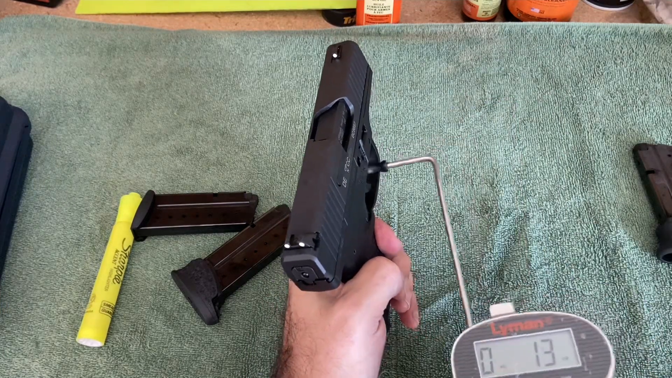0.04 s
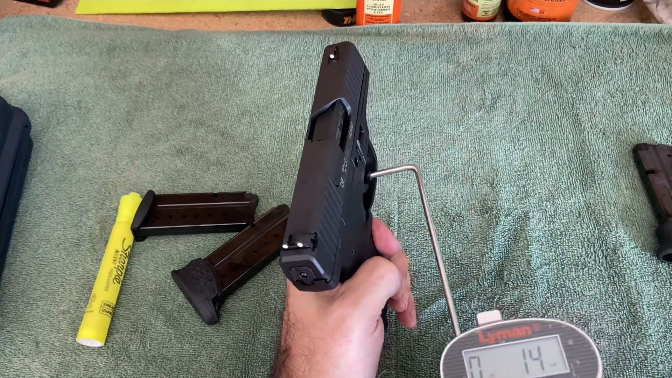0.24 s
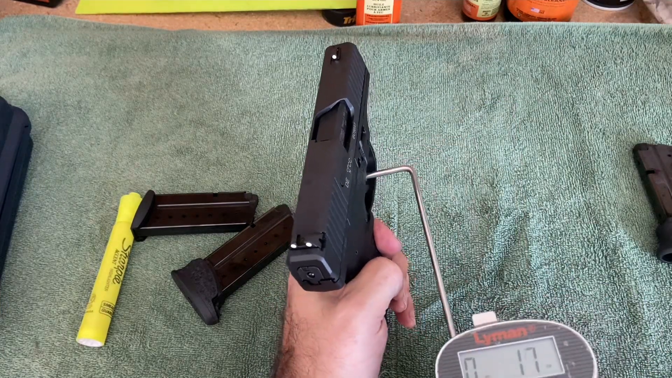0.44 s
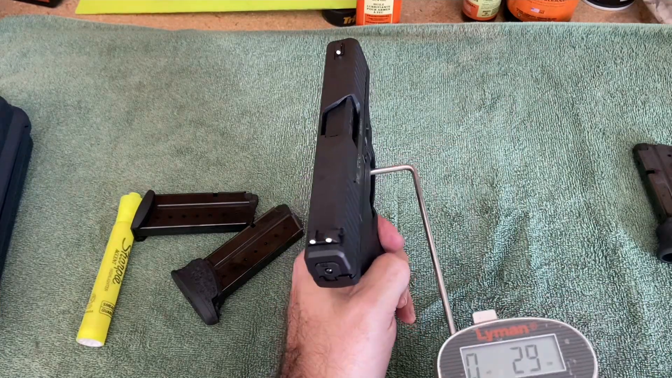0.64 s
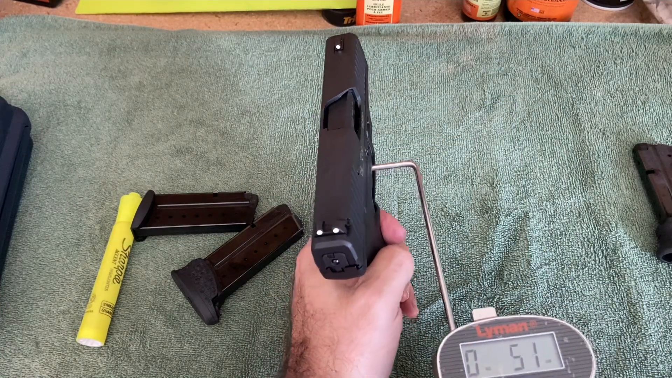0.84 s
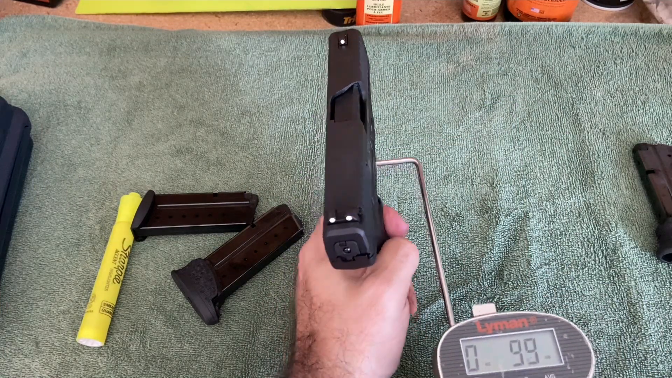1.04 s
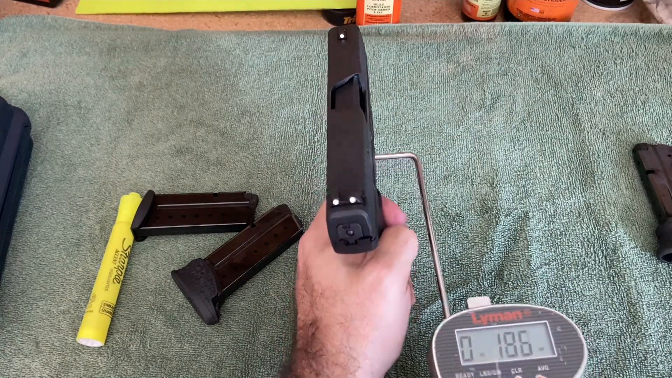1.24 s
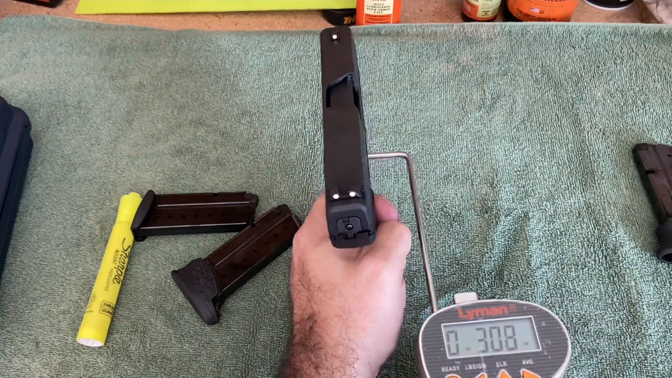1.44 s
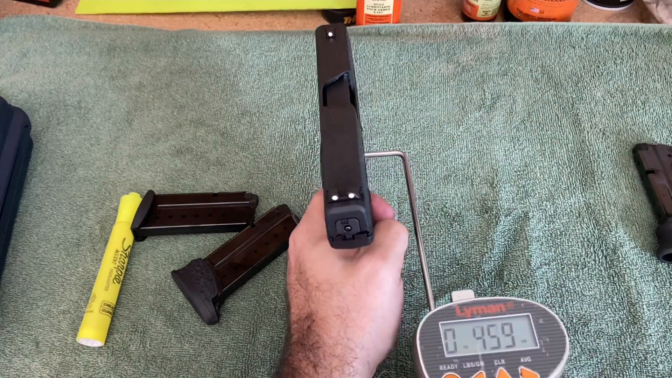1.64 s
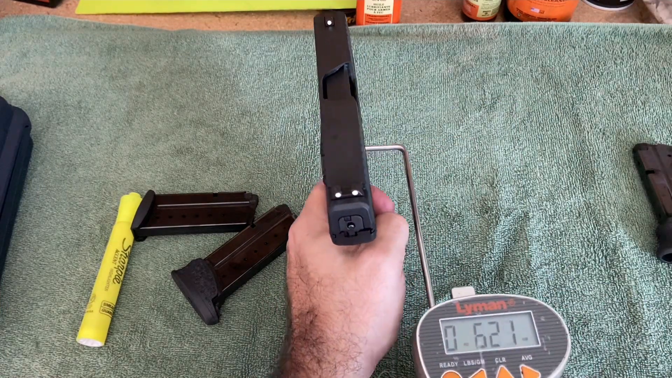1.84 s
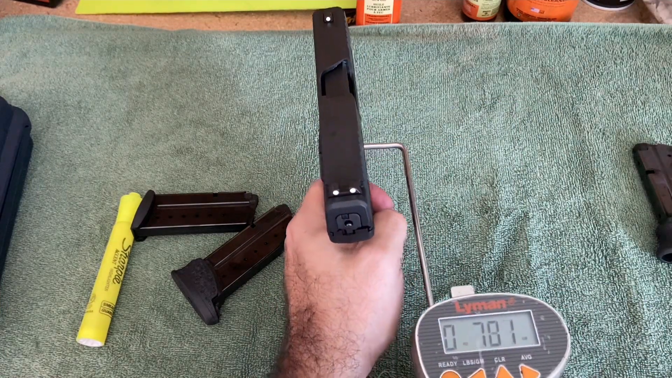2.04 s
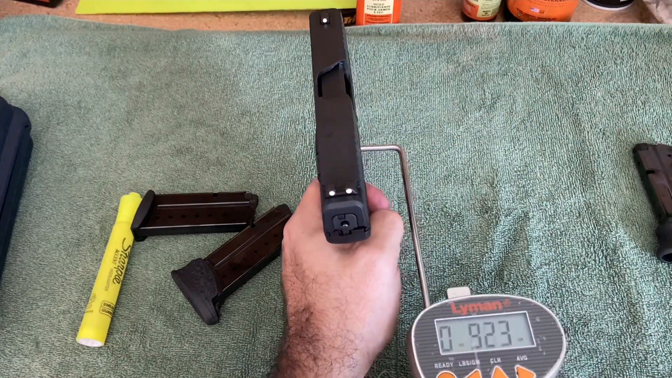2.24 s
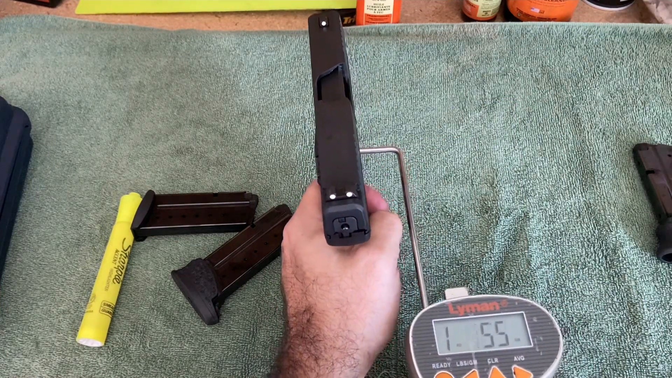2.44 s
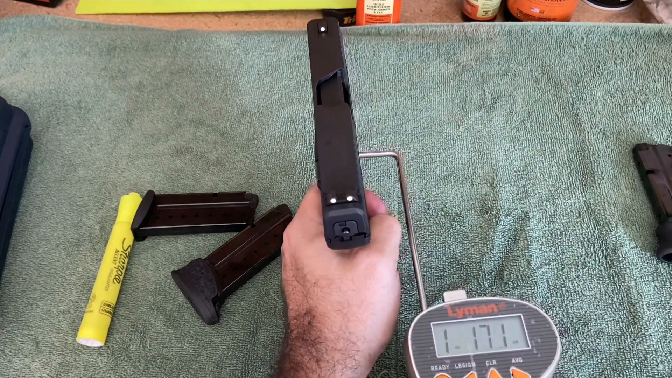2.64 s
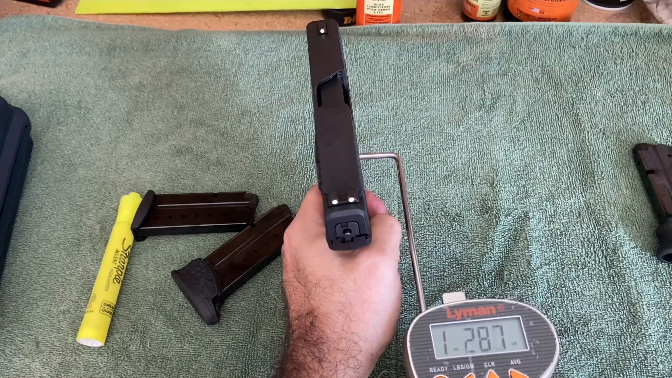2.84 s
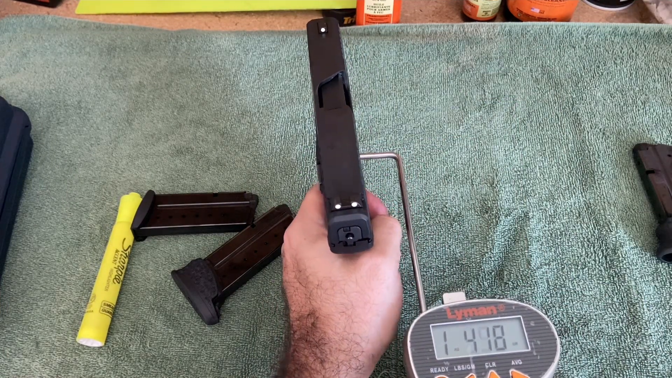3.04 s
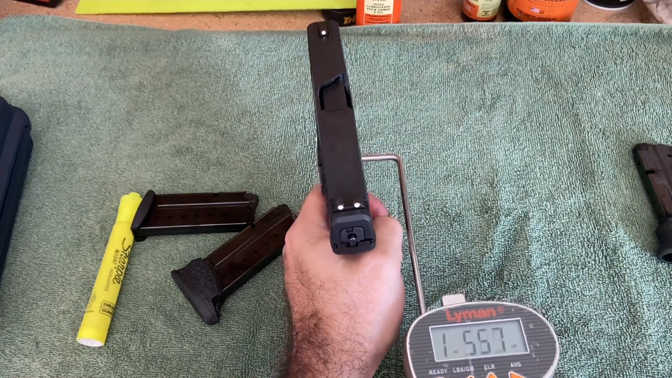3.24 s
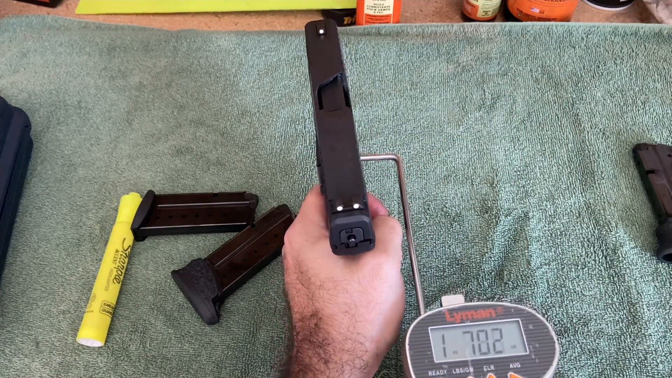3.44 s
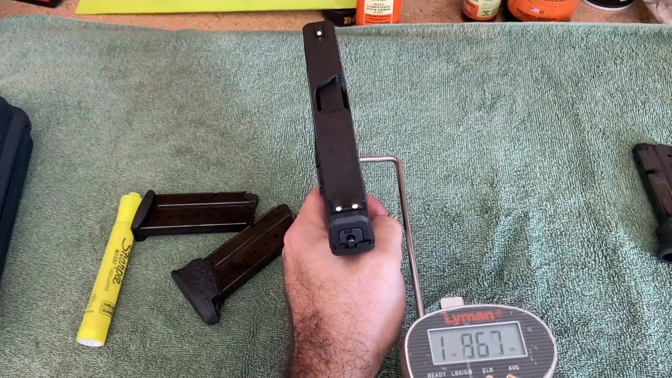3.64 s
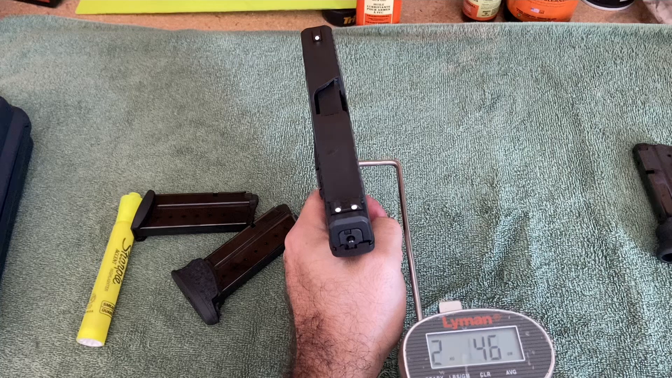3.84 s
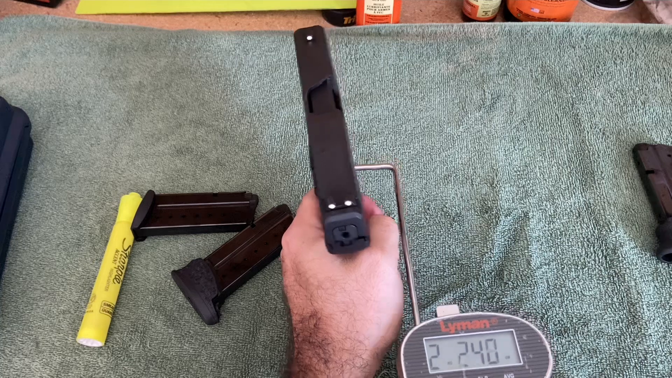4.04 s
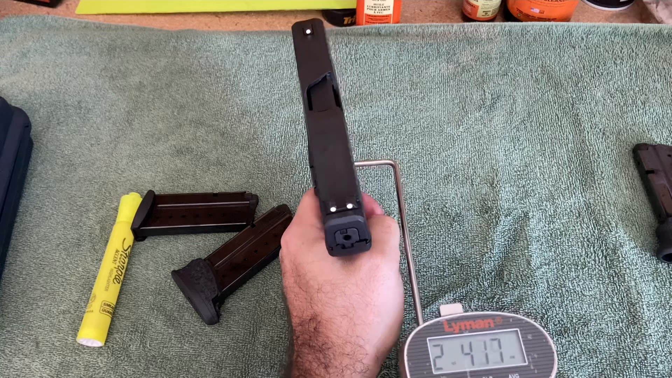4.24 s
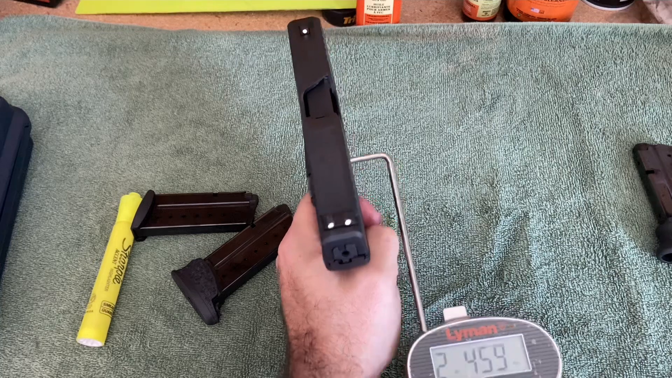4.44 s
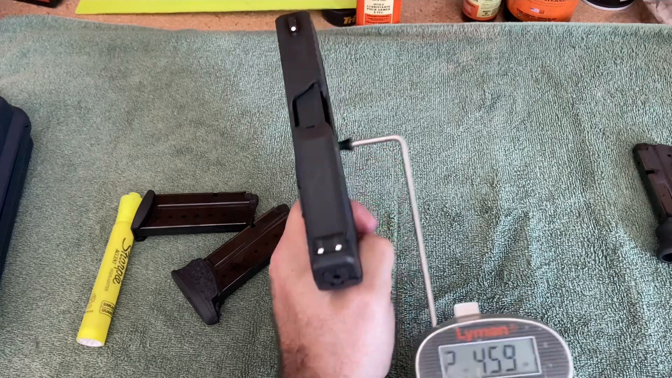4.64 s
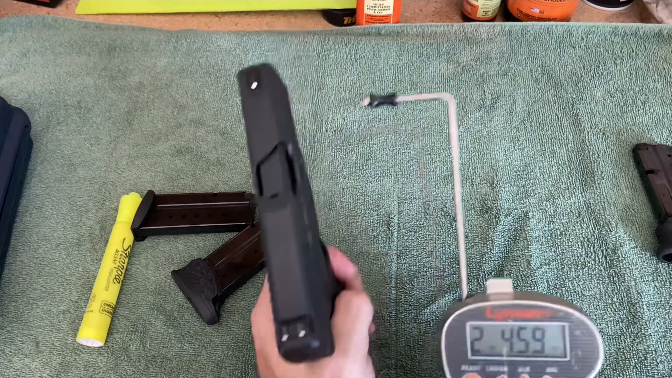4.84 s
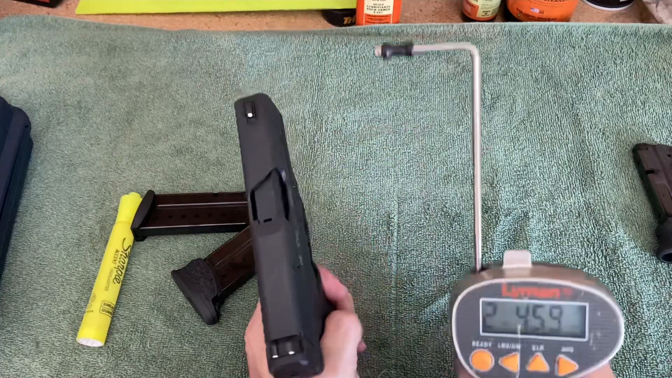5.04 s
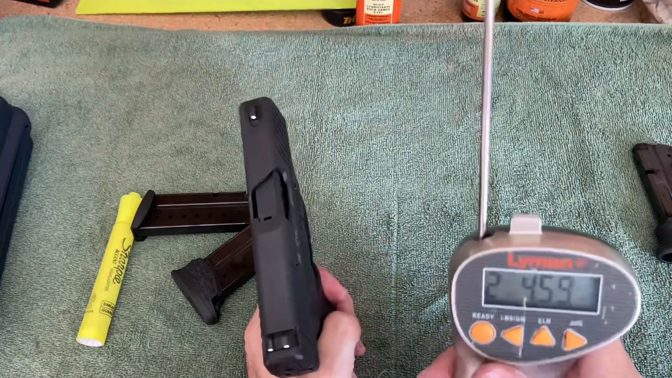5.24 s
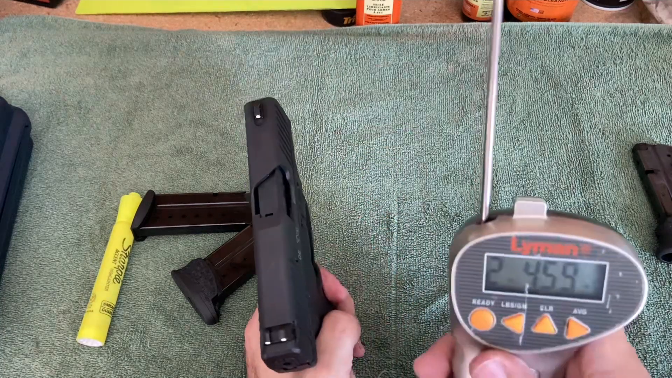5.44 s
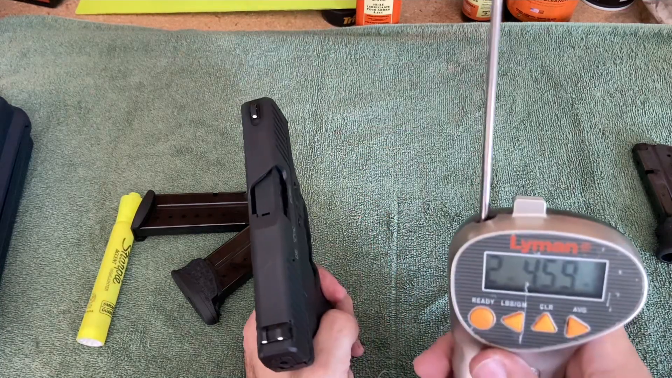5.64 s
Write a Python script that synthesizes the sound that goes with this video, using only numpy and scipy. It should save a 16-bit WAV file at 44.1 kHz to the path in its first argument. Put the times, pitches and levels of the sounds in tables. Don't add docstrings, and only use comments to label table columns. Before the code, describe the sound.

Very close to a phone microphone in a quiet room, an unloaded pistol's trigger is pulled slowly by a metal gauge hook. Sparse, tiny ticks come first, a few clearer before the end of the pull. Near four seconds the striker releases with a hard, bright metallic snap, far louder than everything else, with brief room echo. Dull settling knocks and thin metal taps follow over faint rumble and fan noise.

```python
import sys
import numpy as np
from scipy import signal
from scipy.fft import rfft, irfft, next_fast_len
from scipy.io import wavfile

SR = 44100
rng = np.random.default_rng(int(sys.argv[2]) if len(sys.argv) > 2 else 0)


def gain_from_db(level_db):
    decades = np.asarray(level_db, float) / 20
    return 10 ** decades


def digitize_waveform(pressure):
    field = np.atleast_2d(pressure).T
    bounded = np.clip(field, -1, 1)
    quanta = np.round(bounded * 32767).astype(np.int16)
    wavfile.write(sys.argv[1], SR, quanta)


N = 251527

STRIKER_S = [3.9512, 3.9522, 3.9542, 3.9556, 3.9586, 3.9606, 3.9642, 3.9680, 3.9760, 4.0125]


def unit(x):
    return x / np.sqrt(np.mean(x ** 2) + 1e-20)


def top(x):
    return x / np.max(np.abs(x))


def along(points, hz):
    f, v = np.transpose(points)
    return np.interp(np.log(hz + 1), np.log(f + 1), v)


def filtered(x, response):
    size = next_fast_len(x.shape[-1] + 8192)
    spectrum = rfft(x, size) * response(np.fft.rfftfreq(size, 1 / SR))
    return irfft(spectrum, size)[..., :x.shape[-1]]


def resonances(modes):
    def response(f):
        total = 0
        for k, (hz, width_hz, db) in enumerate(modes):
            damping = 1j * f * width_hz
            total = total + (-1) ** k * gain_from_db(db) * damping / (hz * hz - f * f + damping)
        return total
    return response


def noise(spectrum, size):
    return unit(filtered(rng.standard_normal(size), lambda hz: gain_from_db(along(spectrum, hz))))


def add(track, s, sound):
    track[round(s * SR):][:len(sound)] += sound


def striker():
    # (level [dB], first pitch [Hz], second pitch [Hz], breadth [octaves])
    contacts = [
        (-14.5, 1100, 2000, 0.2),
        (-6, 3800, 15000, .3),
        (1, 5750, 8500, .25),
        (-4, 1700, 6000, .45),
        (-5.5, 4600, 10400, .2),
        (-10.5, 2800, 12000, .7),
        (-15.5, 5700, 10000, 0.46),
        (-19, 1500, 8800, .35),
        (-26, 2600, 6800, 0.49),
        (-29.5, 6000, 9800, 0.41),
    ]
    modes_hz = [420, 640, 830, 1280, 1560, 1930, 2250, 2490, 2960, 3540, 4600, 5570, 5785, 6980, 7420, 8500,
                9600, 10455, 10645, 12130, 12950, 15000]
    modes_db = [-10.5, -10, -9.5, -0.5, -5.5, 1.5, -3.5, -9, -11.5, -1.5, -0.5, -3, -1, -2, -10, -5, -5,
                -3.5, -8, -10, -4.5, -7.5]
    # (frequency [Hz], level [dB])
    scrape = [(300, -26), (900, -3.5), (2000, -5), (5000, 0.5), (10000, -5.5), (15000, -7)]
    grip_t60_s = 0.018
    scrape_base_db, scrape_per_octave_db, take_up_db = -9.5, 11, -20
    rings, scrapes = np.zeros(N + SR), np.zeros(N + SR)
    t = np.arange(SR // 16) / SR
    hz, level_db = np.array([modes_hz, modes_db])[:, :, None]
    for s, (db, first_hz, second_hz, octaves) in zip(STRIKER_S, contacts):
        first_octaves, second_octaves = np.abs(np.log2(hz / first_hz)), np.abs(np.log2(hz / second_hz))
        distance = np.minimum(first_octaves, second_octaves) / octaves
        share_db = level_db - np.minimum(9 * distance ** 2, 22) + rng.standard_normal(hz.shape)
        blow = gain_from_db(db - 3.5 - 60 * t / grip_t60_s) * (1 - np.exp(-t / 0.00028))
        add(rings, s, blow * np.sum(gain_from_db(share_db) * np.sin(2 * np.pi * hz * t), 0))
        scrape_db = scrape_base_db + scrape_per_octave_db * octaves + take_up_db * (s == STRIKER_S[0])
        add(scrapes, s, blow * gain_from_db(scrape_db) * noise(scrape, len(t)))
    jolt = (1 - t / 0.004) * np.exp(-t / 0.003) * (1 - np.exp(-t / 0.00089))
    add(rings, STRIKER_S[1], gain_from_db(-36.5) * jolt)
    return rings[:N], scrapes[:N]


def slide():
    ring_hz = [5790, 10470, 10645, 1900]
    # (level [dB], t60 [s])
    ring = [(-36, 0.1), (-32, 0.3), (-32, 0.36), (-41.5, .4)]
    out, t = np.zeros(N + SR), np.arange(SR // 2) / SR
    for hz, (db, t60_s) in zip(ring_hz, ring):
        wander_rad = np.cumsum(rng.standard_normal(len(t))) * 0.13
        add(out, STRIKER_S[2], gain_from_db(db - 60 * t / t60_s) * np.sin(2 * np.pi * hz * t + wander_rad))
    return out[:N]


def ticks(table, body, crack_db, scrape_t60_s, width_hz, bright_db):
    # (frequency [Hz], level [dB])
    crack_spectrum = [(150, -21), (450, -5), (1500, 4), (2500, -4), (5000, -5), (7500, -12), (16000, -33.5)]
    # (frequency [Hz], level [dB])
    fizz_spectrum = [(4000, -28), (7000, 1), (10000, -5.5), (15000, -11)]
    first_touch = 16
    out, t = np.zeros(N + SR), np.arange(SR // 10) / SR
    fade = gain_from_db(-60 * t / abs(scrape_t60_s)) * (1 - np.exp(-t / 0.00023))

    def twice(x, modes):
        return top(filtered(x, lambda f: resonances(modes)(f) ** 2))

    for s, db, low_db, high_db, spot_hz in table:
        force = rng.standard_normal(len(t)) * fade + first_touch * (t == 0)
        low = twice(force, body[0])
        high = twice(force, body[1] + [(spot_hz, width_hz, 0)])
        crack = top(noise(crack_spectrum, len(t)) * fade)
        fizz = top(noise(fizz_spectrum, len(t)) * fade)
        mix = gain_from_db(crack_db) * crack + gain_from_db(bright_db + 8.5) * fizz
        mix += gain_from_db(low_db + 6.5) * low + gain_from_db(high_db + 3.5) * high
        add(out, s + 0.0006, gain_from_db(db) * mix)
    return out[:N]


def repeats(start_s, gap_s, first, loss_db, low_loss_db, count):
    db, low_db, high_db, pitches_hz = first
    return [(start_s + k * gap_s, db - k * loss_db, low_db - k * low_loss_db, high_db,
             pitches_hz[k % len(pitches_hz)]) for k in range(count)]


def trigger_lever():
    # (time [s], peak [dB], low ring [dB], high ring [dB], contact pitch [Hz])
    clicks = [
        (0.18, -50, -21, -18, 5300),
        (0.188, -52, -19, -6.5, 6230),
        (0.31, -60.5, -16, -10, 5530),
        (3.754, -33.5, -24, -8, 5600),
        (3.760, -50, -11, -9, 5500),
    ]
    # (frequency [Hz], width [Hz], level [dB])
    body = [
        [(1120, 300, 0), (2000, 600, -1)],
        [(4500, 600, -3)],
    ]
    # (crack [dB], scrape t60 [s], contact width [Hz], brightness [dB])
    touch = (-13, -0.02, 600, -30)
    return ticks(clicks, body, *touch)


def gauge_hook():
    # (time [s], peak [dB], low ring [dB], high ring [dB], contact pitch [Hz])
    taps = [
        (0.194, -57, -6, -4.5, 4170),
        (1.235, -54.5, -8, -31, 5370),
        (3.671, -53, -9, -26, 4310),
        (4.426, -45.5, -19.5, -30, 4010),
        (4.432, -53.5, -12, -10, 5900),
        (4.677, -34, -13.5, -12, 4470),
        (4.684, -37.5, -22, -6.5, 5840),
        (4.694, -47, -15, -8, 4358),
    ]
    # (peak [dB], low ring [dB], high ring [dB], pitches [Hz])
    swing = (-56.5, -5, -23, [4400])
    # (peak [dB], low ring [dB], high ring [dB], pitches [Hz])
    chatter = (-47.5, -16.5, -9.5, [5760, 4850])
    # (frequency [Hz], width [Hz], level [dB])
    body = [
        [(1150, 200, 0)],
        [(4400, 260, -2), (5900, 260, -3)],
    ]
    # (crack [dB], scrape t60 [s], contact width [Hz], brightness [dB])
    touch = (-9, 0.04, 500, -25.5)
    swings = repeats(0.203, 0.1165, swing, loss_db=7.5, low_loss_db=0, count=3)
    chatters = repeats(4.467, 0.008, chatter, loss_db=2.5, low_loss_db=2.5, count=4)
    return ticks(taps + swings + chatters, body, *touch)


def trigger_creep():
    # (time [s], peak [dB], low ring [dB], high ring [dB], contact pitch [Hz])
    slips = [(0.992, -58.5, -11, -3, 4200), (1.233, -47, -13, -15, 6650), (2.067, -53, -23, -9.5, 3720),
             (2.709, -33.5, -13, -10, 3730), (2.714, -54.5, 0, -25, 5180), (3.048, -61, -20, -11, 4340),
             (3.649, -31, -14, -6, 3770), (3.656, -50, -8, -24, 4470), (4.467, -47, -20, -11, 4660),
             (4.8, -48.5, -17, -10, 4740), (4.956, -44.5, -17.5, -14, 3060)]
    # (frequency [Hz], width [Hz], level [dB])
    body = [
        [(1130, 300, 0), (620, 400, -3), (2250, 600, -1)],
        [(5050, 900, 0), (11200, 900, -12), (7450, 600, -6), (9300, 600, -14)],
    ]
    # (crack [dB], scrape t60 [s], contact width [Hz], brightness [dB])
    touch = (-10.5, 0.04, 702, -33)
    return ticks(slips, body, *touch)


def frame_settling():
    # (time [s], peak [dB], low ring [dB], high ring [dB], contact pitch [Hz])
    knocks = [
        (4.146, -41.5, -11, -28, 5500),
        (4.217, -45.5, -9, -22, 5700),
        (4.256, -50, -3.5, -18, 4300),
        (4.268, -47, -20, -15, 4800),
        (4.295, -54, -0.5, -20, 4600),
        (4.322, -48.5, -11, -17, 5100),
        (4.345, -64, 1, -23, 4100),
        (4.415, -54, -21, -11, 6000),
    ]
    # (frequency [Hz], width [Hz], level [dB])
    body = [
        [(960, 780, 7.5), (665, 740, 0)],
        [(2276, 830, -2)],
    ]
    # (crack [dB], scrape t60 [s], contact width [Hz], brightness [dB])
    touch = (-8, 0.08, 900, -40)
    return ticks(knocks, body, *touch)


def gauge_lift():
    # (time [s], peak [dB], low ring [dB], high ring [dB], contact pitch [Hz])
    clicks = [
        (4.961, -57, -10, -6, 3000),
        (4.985, -66, -9, -30, 3000),
    ]
    # (frequency [Hz], width [Hz], level [dB])
    body = [
        [(1478, 96, 0)],
        [(4940, 500, -7)],
    ]
    # (crack [dB], scrape t60 [s], contact width [Hz], brightness [dB])
    touch = (-15, 0.2, 700, -32)
    return ticks(clicks, body, *touch)


def room(x):
    # (frequency [Hz], t60 [s])
    decay = [(300, .2), (1000, 0.37), (3000, 0.38), (6000, 0.44), (10000, 0.35), (13000, .27),
             (15500, 0.26)]
    # (frequency [Hz], level [dB])
    colour = [(200, -4), (1000, 1.5), (3000, 3), (6000, -5), (10000, -1), (15000, 0.5)]
    hz, t, z = signal.stft(rng.standard_normal(SR * 3 // 4), SR, nperseg=256)
    tail_db = along(colour, hz)[:, None] - 60 * t / along(decay, hz)[:, None]
    tail = signal.istft(z * gain_from_db(tail_db), SR, nperseg=256)[1]
    tail = tail * (1 - np.exp(-np.arange(len(tail)) / SR / 0.002))
    return signal.fftconvolve(x, tail / np.linalg.norm(tail))[:N]


def air_rumble(t):
    # (time [s], level [dB])
    rumble_level = [(0.0, -50.5), (0.16, -38), (1.27, -47.5), (1.46, -35), (1.7, -45.5), (2.46, -39),
                    (5.64, -44), (5.7, -47)]
    # (frequency [Hz], level [dB])
    rumble = [(1, -25), (3, 4), (12, 12.5), (21, -4), (27, -10.5), (33, -19), (45, -74.5)]
    return gain_from_db(np.interp(t, *np.transpose(rumble_level))) * noise(rumble, N)


def fan_and_hum(t):
    # (time [s], level [dB])
    fan_level = [(0, -73.5), (1, -73.5), (2, -74.5), (3.5, -75), (4.7, -75.5), (5.7, -77)]
    # (frequency [Hz], density [dB per Hz])
    fan = [(260, -32.5), (450, -2), (548, 3), (592, -8.5), (640, 1.5), (807, -4.5), (887, -2.5),
           (1050, -3.5), (1820, -2.5), (2070, -5.5), (3500, -17.5), (4550, -50), (7700, -120)]
    # (frequency [Hz], width [Hz], level [dB])
    whines = [(158, 2.7, -74.5), (284.6, 6, -91), (422, 6, -91.5), (612.2, 8.2, -88), (852, 6, -92.5)]
    # (frequency [Hz], density [dB per Hz])
    hum = [(20, -29.5), (34, 0), (38, -6.5), (60, -3.5), (81, -16), (167, -15.5), (228, -24.5),
           (254, -29.5), (280, -24), (315, -35), (359, -27), (387, -37.5), (426, -29.5), (450, -38),
           (580, -65.5), (990, -120)]
    fan_db = np.interp(t, *np.transpose(fan_level))
    drift_db = fan_db - fan_db.mean()
    whine = np.zeros(N)
    for hz, width_hz, db in whines:
        band = filtered(rng.standard_normal(N), resonances([(hz, width_hz, 0)]))
        whine += gain_from_db(db) * unit(band)
    out = gain_from_db(fan_db + 0.5) * noise(fan, N) + gain_from_db(drift_db) * whine
    return out + gain_from_db(-57 + 0.34 * drift_db) * noise(hum, N)


def hiss():
    # (frequency [Hz], density [dB per Hz])
    spectrum = [(2060, -33), (3500, -2), (3910, -1.5), (5050, -5), (5470, -5.5), (14600, -10), (15100, -8)]
    return gain_from_db(-82.5) * noise(spectrum, N)


def scene():
    rings, scrapes = striker()
    small = trigger_lever() + gauge_hook() + trigger_creep() + frame_settling() + gauge_lift()
    spread = gain_from_db(-25.5) * rings + gain_from_db(-11) * scrapes + gain_from_db(-21.5) * small
    t = np.arange(N) / SR
    background = air_rumble(t) + fan_and_hum(t) + hiss()
    return (rings + scrapes + slide() + small + room(spread) + background)[None]


def roll_off(x):
    return signal.sosfilt(signal.butter(12, 16810, fs=SR, output="sos"), x)


def record(dry):
    ceiling, top_hz = 0.9, 15700
    x = dry / (1 + np.abs(dry / ceiling) ** 4) ** (1 / 4)
    x = filtered(x, lambda hz: 1 / (1 + (hz / top_hz) ** 60))
    return roll_off(x)


dry = scene()
out = record(dry)
digitize_waveform(out)
```